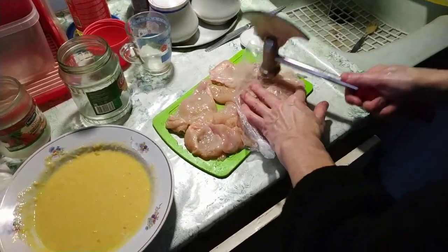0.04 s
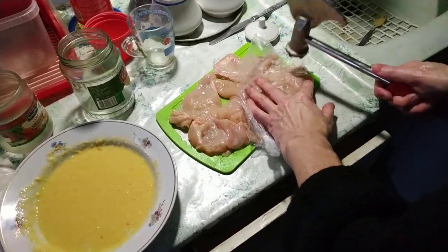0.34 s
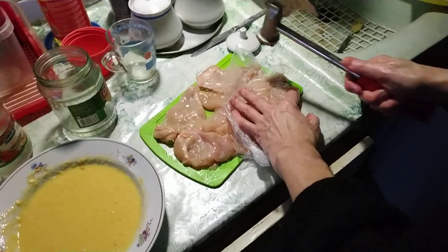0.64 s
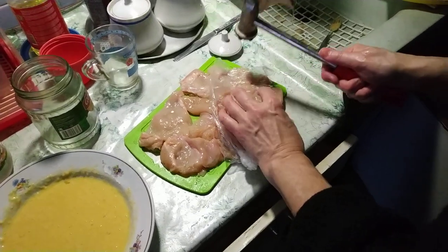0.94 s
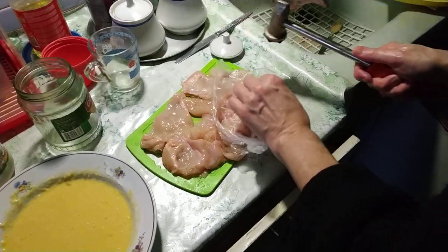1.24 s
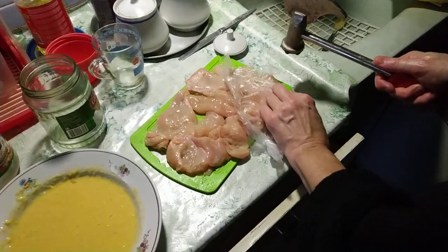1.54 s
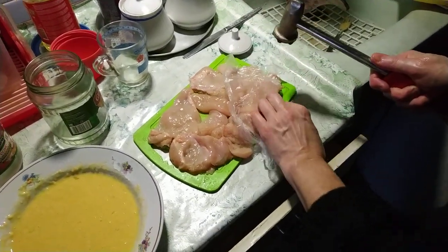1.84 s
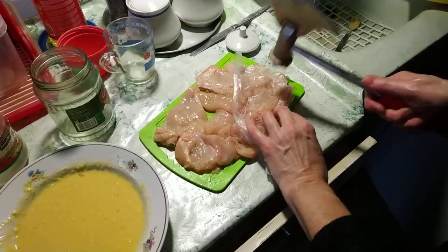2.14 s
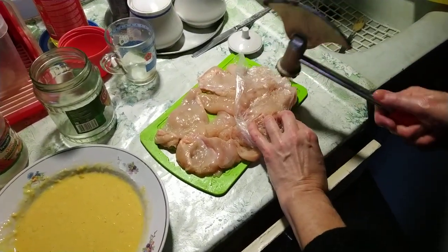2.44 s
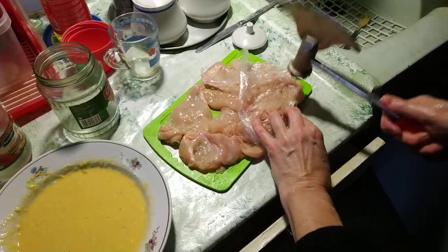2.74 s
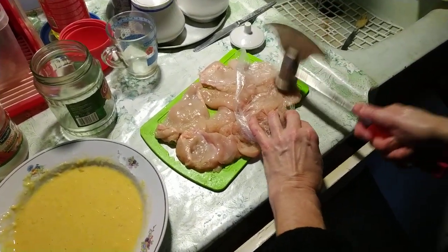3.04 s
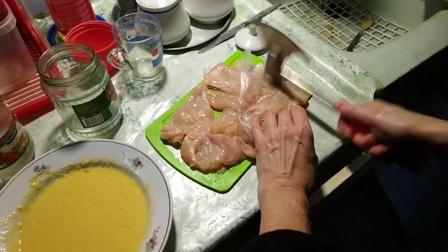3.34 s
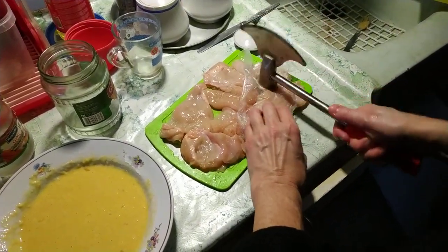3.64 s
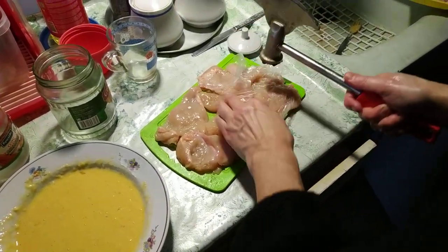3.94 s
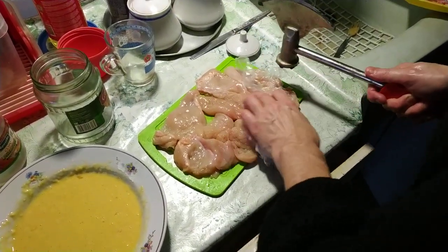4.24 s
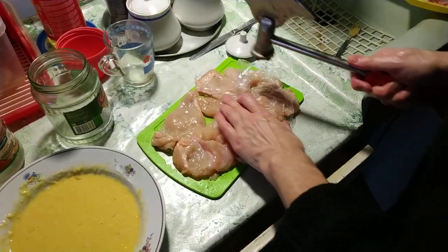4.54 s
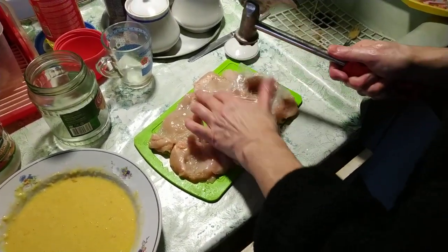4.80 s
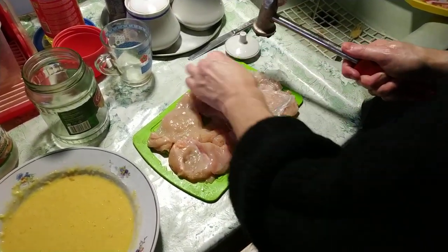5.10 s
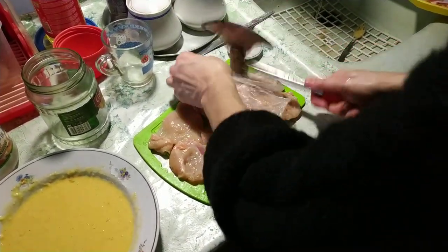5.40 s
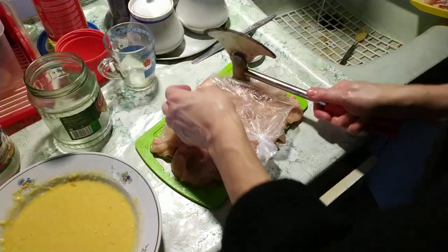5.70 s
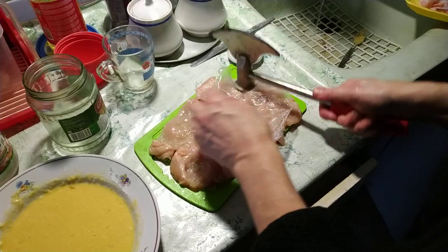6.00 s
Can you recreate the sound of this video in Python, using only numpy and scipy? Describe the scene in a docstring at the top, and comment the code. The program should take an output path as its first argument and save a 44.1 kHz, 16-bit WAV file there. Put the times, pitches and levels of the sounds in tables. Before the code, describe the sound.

A steel mallet pounds raw chicken through a thin plastic bag on a cutting board, heard close in stereo in a small kitchen. Four blows fall in the first 0.8 seconds, each a crisp crush of plastic with a wet slap and a dull knock. From about 1 to 2 seconds the bag is dragged along with a fine, bright crinkling. Seven more blows follow from 2 to 3.7 seconds, nearly four a second, with faint wet squeaks and ticking creases among them; the last lands with a heavier thud. The bag rustles again in uneven swells until about 5.4 seconds, with sharp little snaps near 4 seconds. Three firm blows at about 5.5, 5.7 and 6 seconds knock more hollowly and set the counter ringing briefly. A short room reverberation and a quiet, low, steady room tone lie underneath throughout.

```python
"""A steel mallet pounds chicken fillets through a thin plastic bag, on a cutting board on a kitchen counter.
Each blow crushes the film, slaps the meat and sinks until it knocks on the board; hard blows set the
counter ringing. Wet meat squeaks, creases snap, and between the runs of blows a hand drags the
crinkling bag to the next fillet. Heard from close by on a pair of microphones, with the small kitchen
answering over a low, steady room tone."""
import sys
import numpy as np
from scipy import signal
from scipy.fft import rfft, irfft, next_fast_len
from scipy.io import wavfile
from scipy.ndimage import uniform_filter1d

SR = 44100
rng = np.random.default_rng(int(sys.argv[2]) if len(sys.argv) > 2 else 0)


def log_audio(samples):
    """Write samples as a 16-bit WAV file to the path given in sys.argv[1]."""
    # one column per channel
    frames = np.atleast_2d(samples).T
    # limit to full scale, then quantise
    limited = np.clip(frames, -1, 1)
    pcm = np.round(limited * 32767).astype(np.int16)
    wavfile.write(sys.argv[1], SR, pcm)


N = 267246

# mallet blows: slap t/s, film lead/s, film decay/s, sinking to the board/s, film/dB, slap/dB,
# slap tilt/(dB per octave), knock/dB, pitch of the spot/Hz, thud/dB, rebound/dB, ring/dB,
# shove/dB, peel/dB
MALLET_BLOWS = [ (0.017, 0.011, 0.019, 0.0057, -17.5, -29.5, -0.3, -23.5, 390, -21, -33, -38, -38, -53),
                (.275, 0.012, .016, 0.016, -18.5, -30.5, -0.2, -25.5, 380, -43, -22.5, -40, -38, -49),
                (0.504, 0.012, .021, .0135, -19.5, -31, -0.3, -31.5, 385, -42, -24, -48, -41, -37.5),
                (.809, .025, 0.017, .013, -17.5, -37, 2, -22.5, 411, -25, -22, -33, -46, -29),
                (2.0323, 0.006, 0.02, 0.017, -16, -29.5, 0.8, -20, 355, -23, -35, -43, -30, -36),
                (2.3125, 0.0032, .014, .015, -15.5, -29, 1.5, -20.5, 248, -29, -38, -43, -33, -32),
                (2.581, 0.012, 0.015, .011, -17.5, -28.5, 0.5, -34, 310, -31, -29, -30.5, -31, -34),
                (2.846, 0.0087, .011, 0.01, -17, -29.5, 0.5, -30, 262, -43, -26, -41, -31, -28.5),
                (3.101, .017, 0.0031, 0.012, -14, -35.5, 0.5, -28, 648, -33, -25.5, -32, -42, -34),
                (3.392, 0.006, 0.016, .0098, -17, -32.5, 2, -27, 422, -22, -29, -29, -33, -31.5),
                (3.676, .01, 0.003, .0037, -15, -30, 1.5, -14.5, 339, -11.5, -25, -20, -39, -33),
                (5.462, 0.025, 0.015, 0.0028, -20, -27, 0.5, -18.5, 547, -21, -21, -17.5, -35, -59),
                (5.730, 0.015, .008, 0.0022, -18, -26.5, 1, -14.5, 273, -21, -20, -15, -41, -45),
                (5.99, .014, 0.0052, .0023, -14, -30, 8.5, -15, 293.6, -21, -19, -17, -41, -50)]
# three drags of the bag, each a curve of how hard it rubs: t/s, level/dB
BAG_DRAGS = [
    [(1.045, -53), (1.085, -28), (1.115, -33.5), (1.2, -29.5), (1.32, -26.5), (1.44, -30), (1.5, -34),
     (1.57, -33.5), (1.61, -28), (1.705, -30.5), (1.78, -43), (1.825, -34.5), (1.96, -38), (2.02, -31)],
    [(3.74, -40), (3.814, -39), (3.922, -27.5), (3.99, -30), (4.07, -32), (4.13, -27.5), (4.28, -28.5),
     (4.364, -40), (4.53, -24.5), (4.598, -31), (4.84, -32.5), (4.96, -56)],
    [(4.975, -56), (5.003, -32), (5.059, -27), (5.089, -31), (5.115, -25), (5.175, -27), (5.205, -30),
     (5.271, -32), (5.315, -39.5), (5.393, -33.5), (5.44, -33)],
]
# fingers shifting the bag between blows: t/s, length/s, level/dB
BAG_NUDGES = [(0.07, 0.15, -40.5), (0.638, 0.073, -42), (0.927, 0.06, -43), (2.123, 0.093, -38),
              (2.272, 0.044, -34), (2.653, 0.39, -44.5), (3.16, 0.099, -37), (3.557, 0.093, -39)]
# wet meat squeaking under the film: t/s, level/dB, f/Hz
MEAT_SQUEAKS = [(.143, -37.5, 2050), (2.325, -30, 3860), (2.336, -33, 4000), (2.574, -29.5, 3460),
                (3.22, -34, 3560), (3.293, -41, 3680), (3.393, -30, 3500)]
# single creases snapping over: t/s, level/dB
CREASE_SNAPS = [(0.6475, -28), (0.758, -42), (0.7805, -24), (2.5245, -22.5), (2.557, -42), (3.143, -23),
                (3.372, -29), (3.6446, -35), (3.8412, -23), (3.987, -18), (3.997, -22), (5.8725, -23)]
# modes of board and counter: f/Hz, level/dB, t60/s
COUNTER_MODES = [(130, -21, 0.15), (182.3, -1.5, 0.5), (252, 6.5, 0.51), (308.7, 2.5, 0.437),
                 (404, -14, 0.38), (430, 4, 0.22), (458, -5, 0.45), (572, -4, 0.28), (654, -4, 0.33),
                 (830, 1, 0.27)]

# spectra of the sources: f/Hz, relative level/dB
ROOM_TONE_SPECTRUM = [(18, -105), (45, -85), (100, -32), (127, -14.5), (190, -5), (225, 2), (257, -6.5),
                      (287, 2.5), (326, -9.5), (464, -2.5), (500, -13.5), (538, -5), (579, -13), (684, -10),
                      (2500, -14), (3250, -70), (5500, -120)]
HISS_SPECTRUM = [(300, -20), (1400, -19), (3000, 23), (16000, -13)]
RUSTLE_SPECTRUM = [(40, -74), (300, -37.5), (1300, -7), (2800, -6), (4400, -0.5), (6500, -2), (8800, 1.5),
                   (10700, 5.5), (12200, 4), (13900, 5.5), (16000, -0.5)]  # bag under the hand
CRUSH_SPECTRUM = [(40, -63), (200, -39), (1000, -6), (2800, -8.5), (4200, -3), (6500, -2), (8500, 1),
                  (11000, 3), (14000, 3), (16000, -1.5)]  # film under the mallet
SLAP_SPECTRUM = [(50, -61), (90, -33), (130, -2.5), (200, 10.5), (300, 11.5), (430, 6), (700, 3),
                 (1500, -2), (2200, -3.5), (4000, -6.5), (8000, -14.5), (16000, -29)]  # wet meat
KNOCK_SPECTRUM = [(40, -33.5), (85, -68), (125, -3), (200, 0.5), (330, -0.5), (500, -1), (700, -1.5),
                  (1000, -4.5), (1500, -8.5), (2200, -3), (3000, -11), (5000, -8), (16000, -25)]  # head meeting the board
BOARD_SPECTRUM = [(40, -92), (150, -15), (260, -21), (350, -6), (490, -3), (620, 1), (830, 0.5),
                  (1150, -4.5), (1600, -19), (4000, -28), (16000, -90)]  # the board's hollow body
SHOVE_SPECTRUM = [(25, -40), (50, -21), (85, -19), (115, -4), (150, 0.5), (200, 0), (280, -1.5),
                  (450, -14.5), (1000, -49), (16000, -95)]  # counter giving way

# the kitchen's reverberation: f/Hz, t60/s
ROOM_DECAY = [(100, 0.36), (260, 0.6), (700, 0.44), (1800, 0.39), (5000, 0.36), (13000, 0.18)]
# echoes off splashback, cupboards and ceiling: delay/s, level/dB
ROOM_ECHOES = [(.0032, -5), (.008, -13), (0.0097, -12), (.017, -12.5), (0.032, -15), (0.0424, -13.5),
               (.047, -14), (0.06, -10.5)]
# unequal colour of the microphones: f/Hz, left minus right/dB
MIC_BALANCE = [(100, 2), (250, -1), (600, -2), (1300, 1), (4400, 2.5), (8000, -2.5), (11000, 5),
               (15000, 5.5)]


def amp(db):
    """Decibels to gain."""
    return 10 ** (np.asarray(db) / 20)


def unit_rms(x):
    """Scales to rms 1."""
    return x / np.sqrt(np.mean(x ** 2) + 1e-20)


def read(points, hz):
    """Reads a table on a log-frequency axis."""
    f, value = np.transpose(points)
    return np.interp(np.log(hz + 1), np.log(f + 1), value)


def add(mix, s, sound):
    """Mixes a stereo sound in at time s."""
    part = mix[:, max(round(s * SR), 0):][:, :sound.shape[1]]
    part += sound[:, :part.shape[1]]


def centred(x):
    """Puts a mono sound on both microphones alike."""
    return np.tile(x, (2, 1))


def panned(x, left_db):
    """Leans a sound towards the left microphone, or the right if negative."""
    return x * amp([[left_db / 2], [-left_db / 2]])


def pulse(spectrum, top_hz=SR, size=4096):
    """A minimum-phase click of energy 1 with this spectrum, rolled off above top_hz."""
    hz = abs(np.fft.fftfreq(size, 1 / SR))
    log_gain = np.log(amp(read(spectrum, hz)) / np.hypot(1, (hz / top_hz) ** 2))
    click = np.fft.ifft(np.exp(np.conj(signal.hilbert(log_gain)))).real[:size // 2]
    return click / np.linalg.norm(click)


def crackle(count, spectrum, per_s, spread_db, shared):
    """Tiny random clicks: a stream for each microphone, and one weighted by `shared` on both."""
    sizes = amp(spread_db * np.minimum(rng.exponential(1, (3, count)), 4))
    clicks = sizes * rng.choice([-1, 1], (3, count)) * (rng.random((3, count)) < per_s / SR)
    pair = clicks[:2] + shared * clicks[2]
    return unit_rms(signal.fftconvolve(pair, pulse(spectrum)[None], axes=1)[:, :count])


def diffuse(spectra, hz, mono_hz):
    """Three noise spectra become a stereo pair; long waves reach both microphones alike."""
    same = 1 / np.hypot(1, hz / mono_hz)
    return same * spectra[2] + np.sqrt(1 - same ** 2) * spectra[:2]


def room(x, wet_db, build_s=0.0008):
    """Adds the kitchen's diffuse tail, each band dying at its own speed."""
    hz, t, noise = signal.stft(rng.choice([-1., 1.], (3, SR * 3 // 5)), SR, nperseg=512)
    decay = amp(-60 * t / read(ROOM_DECAY, hz)[:, None])
    tail = signal.istft(diffuse(noise, hz[:, None], mono_hz=620) * decay, SR, nperseg=512)[1]
    tail *= 1 - np.exp(-np.arange(tail.shape[1]) / SR / build_s)
    tail *= amp(wet_db) / np.linalg.norm(tail[0])
    tail[:, 0] += 1  # direct sound
    return signal.fftconvolve(x, tail, axes=1)


def echoed(x, spread_s=0.00023):
    """Adds the first reflections, which reach the two microphones a little apart."""
    out = x.copy()
    for delay, db in ROOM_ECHOES:
        for side in np.eye(2):
            add(out, delay + spread_s * rng.standard_normal(), amp(db) * side[:, None] * x)
    return out


def on_spot(x, spot_hz, bass_share=0.4):
    """A stiff spot passes little bass below a share of its own pitch."""
    return signal.sosfilt(signal.butter(2, bass_share * spot_hz, "highpass", fs=SR, output="sos"), x)


def room_tone(low_db=-43.5, hiss_db=-52):
    """The kitchen's steady low noise, with a faint hiss on each microphone."""
    hz = np.fft.rfftfreq(N, 1 / SR)
    noise = diffuse(rfft(rng.standard_normal((3, N))), hz, mono_hz=700)
    low = irfft(noise * amp(read(ROOM_TONE_SPECTRUM, hz)), N)
    hiss = irfft(rfft(rng.standard_normal((2, N))) * amp(read(HISS_SPECTRUM, hz)), N)
    return amp(low_db) * unit_rms(low) + amp(hiss_db) * unit_rms(hiss)


def hand_effort(hold_db=-43.5, swell_share=0.32, slacken_s=0.042):
    """Long drags and short nudges, over the light touch that holds the bag down."""
    t = np.arange(N) / SR
    power = amp(hold_db) ** 2
    for drag in BAG_DRAGS:
        s, db = np.transpose(drag)
        slacken = np.exp(-np.maximum(t - s[-1], 0) / slacken_s)
        power += (amp(np.interp(t, s, db)) * (t >= s[0]) * slacken) ** 2
    for start, length, db in BAG_NUDGES:
        swell = np.clip((t - start) / (swell_share * length), 0, 1)
        slacken = np.exp(-np.maximum(t - start - length, 0) / slacken_s)
        power += (amp(db) * swell * slacken) ** 2
    return np.sqrt(power)


def bag_rustle(gain_db=1.0, flutter_db=1.63):
    """Dense fine crinkling that follows the hand, in small clumps."""
    clumps = unit_rms(uniform_filter1d(uniform_filter1d(rng.standard_normal(N), size=300), size=150))
    level = hand_effort() * amp(gain_db + flutter_db * clumps)
    crinkles = crackle(N, RUSTLE_SPECTRUM, per_s=16000, spread_db=2, shared=0.026)
    return panned(room(level * crinkles, wet_db=-3.5)[:, :N], left_db=0.5)


def film_crush(lead_s, fall_s, tilt_db, climb_db=13, touch_s=0.0023):
    """Wrinkles collapse ever louder as the mallet comes down, and die away once it has landed."""
    t = np.arange(SR // 6) / SR - lead_s
    level = np.where(t < 0, amp(climb_db * np.minimum(t, 0) / lead_s), np.exp(-np.maximum(t, 0) / fall_s))
    level *= np.minimum((t + lead_s) / touch_s, 1)
    colour = [(hz, db + tilt_db * np.log2(max(hz, 2000) / 2000)) for hz, db in CRUSH_SPECTRUM]
    wrinkles = crackle(len(t), colour, per_s=14000, spread_db=2, shared=0.4)
    return room(level * wrinkles, wet_db=-3.5)


def meat_slap(sink_s, tilt_db, fall_s=0.014):
    """Wet flesh squelches for as long as the head sinks in, brighter where it is wetter."""
    t = np.arange(SR // 6) / SR
    level = np.exp(-np.maximum(t - sink_s, 0) / fall_s)
    colour = [(hz, db + tilt_db * np.log2(min(hz, 3000))) for hz, db in SLAP_SPECTRUM]
    return room(level * crackle(len(t), colour, per_s=2500, spread_db=2.5, shared=13), wet_db=5)


def board_knock(bright_hz, spot_hz, knock_db, thud_db, contact_s=0.0043, thud_t60_s=0.062):
    """The head bottoms out with a short knock; the board answers with a low thud, damped by the meat."""
    t = np.arange(SR // 5) / SR
    click = amp(knock_db) * pulse(KNOCK_SPECTRUM, bright_hz) * np.sqrt(contact_s * SR)
    knock = centred(on_spot(np.pad(click, (0, len(t) - len(click))), spot_hz))
    note = amp(thud_db - 60 * t / thud_t60_s) * np.sin(2 * np.pi * spot_hz * t)
    thud = centred(on_spot(note, spot_hz))
    return room(echoed(knock), wet_db=-4.5, build_s=0.012) + room(thud, wet_db=-5)


def board_rebound(swell_s=0.0056, hollow_hz=605, sharp_share=0.53, settle_s=0.0046, detune=0.039):
    """The board drops back on the counter with a hollow note that falls as the meat settles on it."""
    t = np.arange(SR // 10) / SR
    hz = hollow_hz * (1 + detune * rng.standard_normal()) * (1 + sharp_share * np.exp(-t / settle_s))
    note = t / swell_s * np.exp(1 - t / swell_s) * np.sin(2 * np.pi * np.cumsum(hz) / SR)
    return room(centred(note), wet_db=-7.5, build_s=0.0096)


def board_clatter(rise_s=0.0087, fall_s=0.01):
    """The light board chatters against the counter for a moment after the knock."""
    t = np.arange(SR // 6) / SR
    level = (1 - np.exp(-t / rise_s)) * np.exp(-t / fall_s)
    chatter = crackle(len(t), BOARD_SPECTRUM, per_s=4000, spread_db=-1, shared=1.1)
    return room(level / level.max() * chatter, wet_db=-5)


def counter_ring(spot_hz, build_s=0.037, detune=0.0048, db_per_octave=11, sharp_share=0.069,
                 settle_s=0.031):
    """Board and counter modes swell, start sharp and settle; those near the spot's pitch are favoured."""
    t = np.arange(SR * 2 // 3) / SR
    turns_per_hz = np.cumsum(1 + sharp_share * np.exp(-t / settle_s)) / SR
    ring = np.zeros(len(t))
    for hz, db, t60 in COUNTER_MODES:
        level = amp(db - db_per_octave * abs(np.log2(hz / spot_hz)) - 60 * t / t60)
        turns = hz * (1 + detune * rng.standard_normal()) * turns_per_hz + rng.random()
        ring += level * np.sin(2 * np.pi * turns)
    return centred(ring * (1 - np.exp(-t / build_s)))


def counter_shove(contact_s=0.013):
    """The weight of the blow pushes the whole counter down."""
    thump = pulse(SHOVE_SPECTRUM, size=8192) * np.sqrt(contact_s * SR)
    return room(centred(thump), wet_db=-2, build_s=0.014)


def film_peel(after_s=0.092, width_s=0.028):
    """The film lifts off the meat again as the mallet rises."""
    t = np.arange(SR // 4) / SR
    wrinkles = crackle(len(t), CRUSH_SPECTRUM, per_s=2700, spread_db=1, shared=0.061)
    return np.exp(-0.5 * ((t - after_s) / width_s) ** 2) * wrinkles


def mallet(usual_knock_db=-22.5, usual_sink_s=0.021, usual_bright_hz=2300, shove_lag_s=0.0031):
    """Each blow goes through film and meat to the board; force and depth of meat set its colour."""
    film, body = np.zeros((2, 2, N))
    for (s, lead_s, fall_s, sink_s, film_db, slap_db, slap_tilt_db, knock_db, spot_hz,
         thud_db, rebound_db, ring_db, shove_db, peel_db) in MALLET_BLOWS:
        force_db, depth = knock_db - usual_knock_db, sink_s / usual_sink_s
        film_tilt_db = 0.04 - 0.14 * force_db  # per octave: a hard blow dulls the crush
        bright_hz = usual_bright_hz * 2 ** (force_db / 8) * depth ** 0.66  # harder or deeper is brighter
        clatter_db = -30 + 0.35 * force_db
        knock_s = s + sink_s
        add(film, s - lead_s, amp(film_db) * film_crush(lead_s, fall_s, film_tilt_db))
        add(film, s, amp(peel_db) * film_peel())
        add(body, s, amp(slap_db) * on_spot(meat_slap(sink_s, slap_tilt_db), spot_hz))
        add(body, knock_s + shove_lag_s, amp(shove_db) * counter_shove())
        add(body, knock_s, amp(rebound_db) * board_rebound())
        add(body, knock_s, board_knock(bright_hz, spot_hz, knock_db, thud_db))
        add(body, knock_s, amp(clatter_db) * board_clatter())
        add(body, knock_s, amp(ring_db) * counter_ring(spot_hz))
    return film + panned(body, left_db=-0.5)


def sticky_ticks(level_db=-51, per_s=3, pitches=8, fall_s=0.0005):
    """Wet film lets go of the meat in tiny scattered pops of different pitch."""
    out, t = np.zeros((2, N)), np.arange(SR // 50) / SR
    for hz in np.geomspace(4000, 12000, pitches):
        pop = np.exp(-t / fall_s) * np.sin(2 * np.pi * hz * t)
        releases = (rng.random(N) < per_s / SR) * rng.uniform(0.3, 1, (2, N))
        out += signal.oaconvolve(releases, pop[None], axes=1)[:, :N]
    return amp(level_db) * unit_rms(room(out, wet_db=-2)[:, :N])


def meat_squeaks(swell_s=0.0027):
    """Small air pockets squeeze out from under the film, each a brief wet fizz."""
    out, age = np.zeros((2, N)), np.arange(SR // 20) / SR / swell_s
    for s, db, hz in MEAT_SQUEAKS:
        pocket = [(hz / 8, -60), (hz * 0.65, -18), (hz * 0.9, 0),
                  (hz * 1.1, 0), (hz * 1.5, -18), (hz * 4, -45)]
        fizz = age * np.exp(1 - age) * crackle(len(age), pocket, per_s=5000, spread_db=-3, shared=0.86)
        add(out, s, room(amp(db) * fizz, wet_db=-3))
    return out


def crease_snaps(peak_hz=9600, fall_s=0.005):
    """Single folds of the bag flip with a short bright tick."""
    out, t = np.zeros((2, N)), np.arange(SR // 20) / SR
    colour = [(peak_hz / 100, -60), (peak_hz / 8, -32), (peak_hz / 2 ** 0.4, -10),
              (peak_hz, 0), (peak_hz * 2, -8)]
    for s, db in CREASE_SNAPS:
        tick = np.exp(-t / fall_s) * crackle(len(t), colour, per_s=9000, spread_db=3, shared=0.061)
        add(out, s, room(amp(db) * tick, wet_db=-6, build_s=0.005))
    return out


def scene():
    """Mallet, bag and kitchen as they reach the microphones."""
    return mallet() + bag_rustle() + crease_snaps() + meat_squeaks() + sticky_ticks() + room_tone()


def record(dry, edge_hz=16000):
    """The two microphones' unequal colour, then the band limit."""
    size = next_fast_len(N + SR)
    lean_db = read(MIC_BALANCE, np.fft.rfftfreq(size, 1 / SR))
    coloured = irfft(rfft(dry, size) * amp([lean_db / 2, -lean_db / 2]), size)[:, :N]
    lowpass = signal.firwin(511, edge_hz, window=("kaiser", 9), fs=SR)
    return signal.oaconvolve(coloured, lowpass[None], "same", axes=1)


dry = scene()
out = record(dry)
log_audio(out)
```